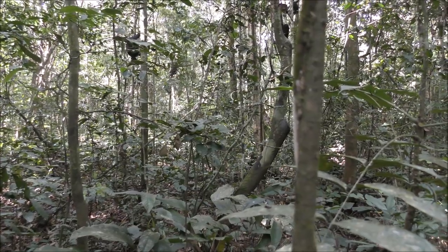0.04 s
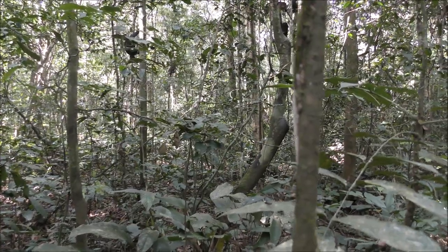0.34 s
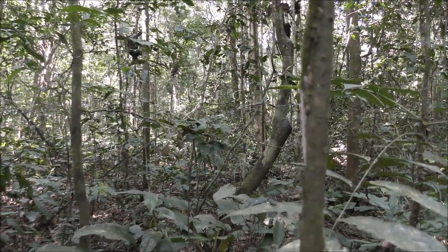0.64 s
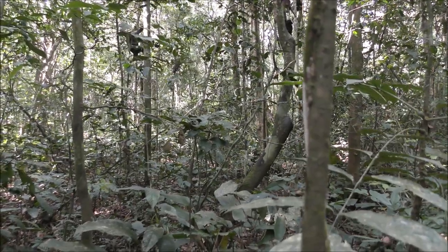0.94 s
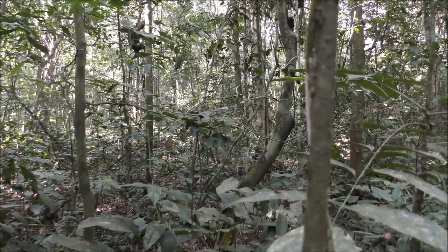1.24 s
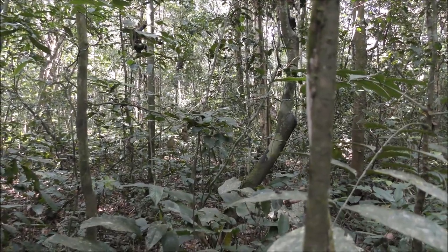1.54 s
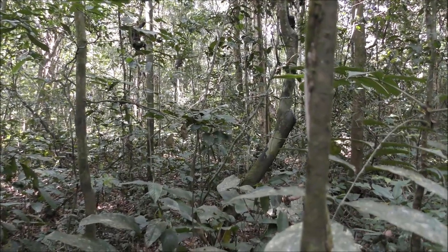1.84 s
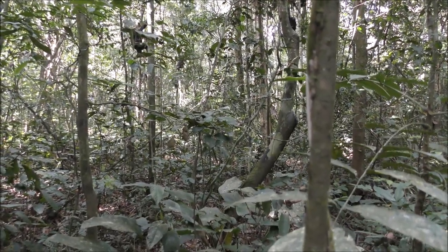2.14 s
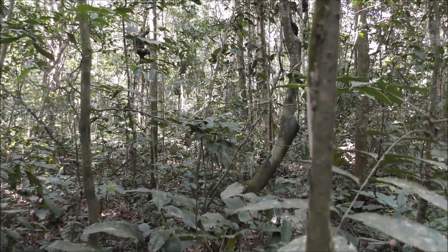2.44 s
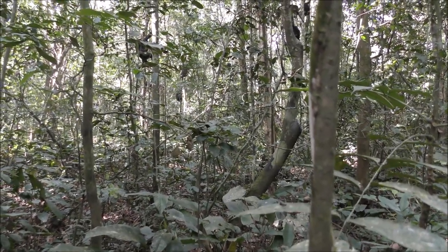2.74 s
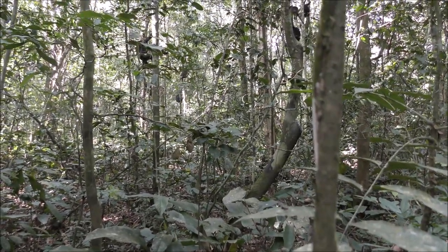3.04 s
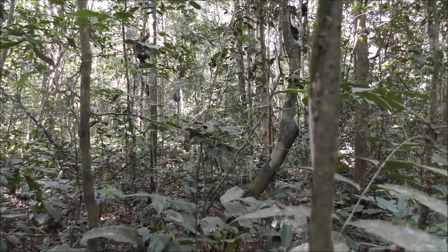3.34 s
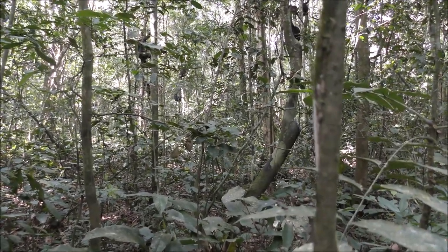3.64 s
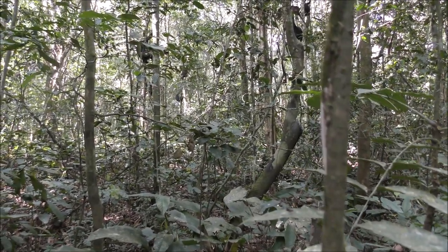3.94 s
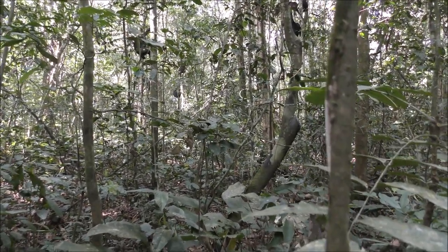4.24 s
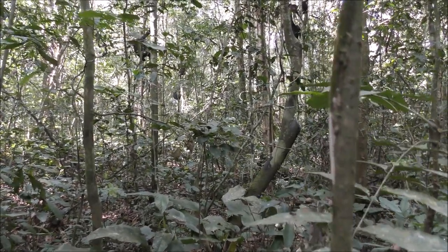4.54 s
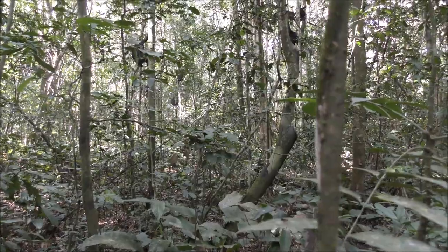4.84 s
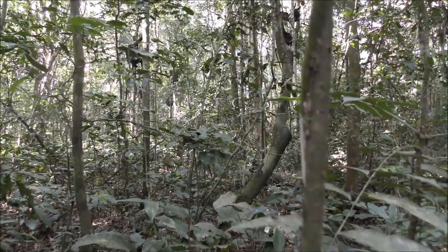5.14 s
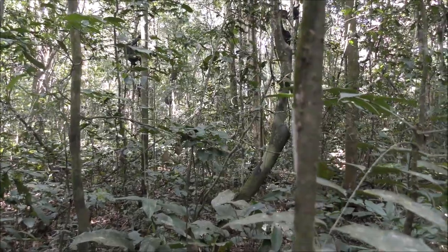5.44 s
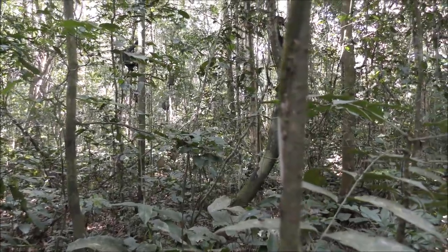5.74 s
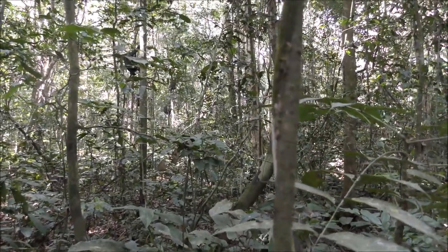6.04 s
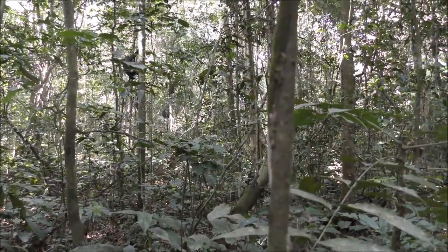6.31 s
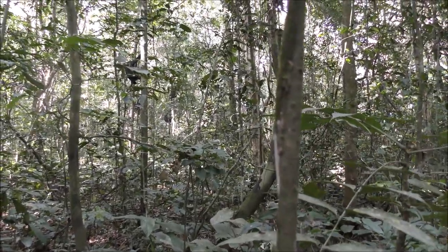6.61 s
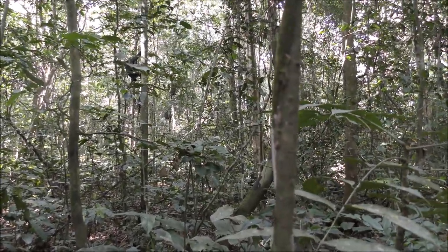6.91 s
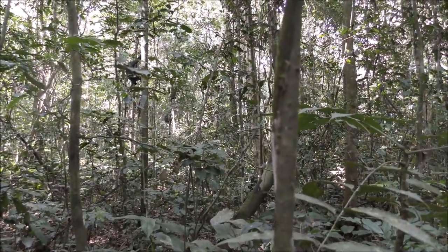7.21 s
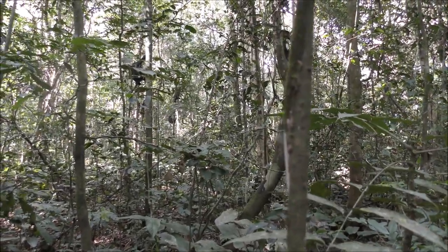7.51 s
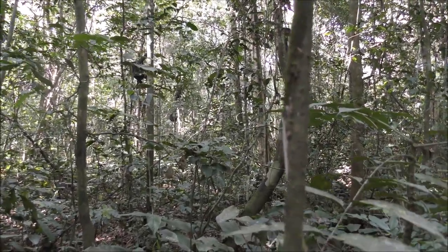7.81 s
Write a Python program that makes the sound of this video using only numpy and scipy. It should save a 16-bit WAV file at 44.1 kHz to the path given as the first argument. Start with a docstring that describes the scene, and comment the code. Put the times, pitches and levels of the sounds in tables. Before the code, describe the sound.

In a dense forest, leaves rustle and a few twigs snap over a low hum and faint, high insect hiss. A nearby ape lets out two loud, arching screams, then quick hoots, a buzzing shriek and a bark, all echoing among the trees. After a lull with scattered twig cracks, a farther animal answers with a few duller calls.

```python
"""Apes screaming in dense forest

Two arching screams, a buzzing shriek, short hoots and a bark are followed by a farther animal's calls.
Vibrating vocal folds give the harmonics, the throat shapes them, and strain adds jitter and rasp.
Trunks scatter the voices into a long tail. Twigs snap, leaves rustle and insects hiss over a low hum."""
import sys
import numpy as np
from scipy import signal
from scipy.fft import rfft, irfft, next_fast_len
from scipy.io import wavfile
from scipy.ndimage import uniform_filter1d

SR = 44100
rng = np.random.default_rng(int(sys.argv[2]) if len(sys.argv) > 2 else 0)


def to_wav(s):
    """Save 16-bit WAV."""
    ch = np.atleast_2d(s).T  # columns
    pcm = np.round(np.clip(ch, -1, 1) * 32767)  # PCM
    wavfile.write(sys.argv[1], SR, pcm.astype(np.int16))


N = 347067
TIME = np.arange(N) / SR
BAND_LIMIT_HZ = 15850

# Each row: start, rise and fall in seconds, starting, top and final pitch in Hz (halved before the
# break), effort in dB, seconds until the voice breaks upward, second harmonic before the break in dB.
SCREAMS = [(2.12, .125, .112, 1189, 3193, 1040, -21.5, 0.0774, 6),
           (2.487, .088, 0.15, 1330, 3571, 1145, -21, 0.052, -3.5)]
# Near hoots with the bark, and far calls. Each row: start, rise and fall in seconds, starting, top and
# final pitch in Hz, effort in dB, roughness from 0 to 1, second harmonic at the top pitch in dB.
NEAR_HOOTS = [(2.811, .062, .012, 1130, 1640, 1600, -28.5, .35, -20),
              (2.93, .045, .014, 950, 1060, 1020, -34.5, .65, 8),
              (2.99, .003, .026, 1200, 1070, 900, -27, .25, 1),
              (3.064, .052, .08, 1330, 1730, 840, -26, .12, -28),
              (3.504, .082, .014, 900, 1680, 1600, -17.5, .32, -20)]
FAR_HOOTS = [(6.84, 0.031, 0.012, 684, 815, 800, -33, 0.18, -14.5),
             (6.863, 0.066, 0.087, 1328, 2181, 1444, -27.5, 0.11, -1.5),
             (7.036, .003, 0.05, 1080, 1039, 770, -27, 0.25, 2),
             (7.43, 0.051, .052, 896, 1177, 881, -26.5, 0.16, 8.5)]
# Loudness as a voice glides through the throat's resonances. Each row: pitch in Hz, gain in dB.
NEAR_RESONANCE = [(600, 2.5), (780, -3.5), (1000, 3), (1200, -1), (1600, -2), (2000, -11.5), (2600, 0),
                  (3400, -3.5)]
FAR_RESONANCE = [(800, -19), (1150, -12), (1550, -3.5), (2200, -4)]
# The throat as a filter. Each row: frequency in Hz, gain in dB.
THROAT = [(1500, -24), (3000, -53), (4300, 8), (5200, -2), (6500, 1), (8000, 0.5), (9600, 3.5), (13000, -5),
          (16000, -10)]  # for harmonics above the second
SHRIEK_THROAT = [(430, -57), (1700, -6), (3400, -10), (3900, 0.5), (4320, 1), (5150, -17), (6600, 0.5),
                 (7600, -8), (8250, -8), (9450, -2), (10200, -9), (13300, -15), (16000, -30)]
# Air rasping through the open mouth. Each row: frequency in Hz, relative spectral density in dB.
RASP = [(600, -101), (1200, -9.5), (2200, 39), (3500, 26), (4400, 11), (6500, 10.5), (10000, 18),
        (16000, 3)]
SHRIEK_RASP = [(600, -39), (1200, 1), (2200, -8), (3500, -0.5), (5000, -2.5), (10000, -12), (16000, -29)]
# Breaking twigs. Each row: start in seconds, peak in dB, body frequency in Hz, treble share in dB,
# 60 dB decay time in seconds, left over right in dB.
SNAPS = [(0.953, -33.5, 5000, 2, 0.062, 6), (1.003, -31.5, 2590, -6, 0.027, 8),
         (1.9036, -22, 2330, 0, 0.11, 6), (1.908, -28, 2980, 2, 0.061, -11),
         (4.197, -32.5, 1480, -8, 0.022, 5), (5.3283, -22, 1160, -9, 0.036, 5),
         (6.005, -25, 1130, -29, 0.041, 6.5), (6.3, -36, 2100, -8, 0.039, 2),
         (7.3657, -26.5, 1150, -14.5, 0.036, 9), (7.383, -26.5, 10300, -12, 0.02, 4.5),
         (7.3838, -21.5, 750, -0.5, 0.018, 1), (7.506, -22, 1460, -8, 0.018, 5),
         (7.524, -32, 1700, -7, 0.059, 7)]
# Modes of dry wood. Each row: frequency in Hz, relative level in dB, 60 dB decay time in seconds.
WOOD_MODES = [(820, -2.5, 0.069), (1320, 4, 0.067), (2340, 8, 0.03), (2840, -41, 0.036)]
# Stirs of foliage. Each row: loudest moment, rise and fall in seconds, swish and crackle strength in dB.
RUSTLES = [(.14, 0.12, .3, -45.5, -59), (.21, 0.036, 0.068, -62, -49), (.51, 0.063, 0.23, -42.5, -54),
           (.8, 0.72, 0.9, -47.5, -55.5), (1.42, 0.083, 0.76, -54, -58), (1.832, 0.094, 0.14, -42.5, -47.5),
           (1.94, 0.084, 0.15, -42, -39.5), (6.29, 0.15, 0.22, -52.5, -66), (6.51, 0.068, 0.14, -63, -48.5),
           (7.835, 0.019, 0.031, -41, -65)]
# Noise spectra. Each row: frequency in Hz, relative spectral density in dB.
SWISH_SPECTRUM = [(410, -13), (700, -13), (905, -16), (1120, -4.5), (2170, -5), (2390, -5.5), (5510, -15),
                  (9000, -20.5), (11700, -21), (19800, -120)]
CRACKLE_SPECTRUM = [(3000, -4), (5500, -5), (9500, -2), (12500, -4), (16000, -13)]
CHORUS_SPECTRUM = [(6700, -35), (7300, -7), (7600, -2), (7950, 0), (8250, -10), (8700, -35)]
HUM_SPECTRUM = [(20, -25), (37, -33), (72, -6), (190, 0), (450, -7), (560, -16), (800, -17.5),
                (1600, -12.5), (4500, -23), (6200, -26.5), (9000, -25), (16000, -31.5)]
# The insect chorus. Each row: time in seconds, level in dB.
CHORUS_LEVEL = [(0, -58.5), (4.2, -59.5), (4.6, -59.5), (6.4, -59.5), (7.2, -58), (7.87, -60)]
# Single insects. Each row: start and end in seconds, frequency and bandwidth in Hz, level in dB.
CHIRPS = [(5.623, 6.0, 6200, 300, -67), (6.2, 6.42, 12600, 300, -71), (7.55, 7.65, 12290, 90, -55),
          (7.67, 7.78, 12290, 90, -60), (7.8, 7.87, 12290, 90, -61)]
# Likeness of the hum at the two ears. Each row: frequency in Hz, correlation.
HUM_CORRELATION = [(30, 0), (80, 0.79), (170, 0.92), (400, 0.9), (950, 0.94), (2400, 0.5), (6000, 0.94)]
# Decay of the forest's reverberation. Each row: frequency in Hz, 60 dB decay time in seconds.
TAIL_T60 = [(300, 0.36), (1000, 1.28), (2200, 1.17), (4000, 1.06), (7000, 0.97), (10000, 0.82),
            (15000, 0.45)]
# Its initial spectrum. Each row: frequency in Hz, relative level in dB.
TAIL_SPECTRUM = [(300, -45), (800, -10), (1500, -3.5), (3000, 3.5), (6000, 4), (12000, 3)]


def scream(rise_s, fall_s, start_hz, top_hz, end_hz, effort_db, break_s, low_second_db,
           swell_db=13, fade_db=-7, blend_s=0.0013, strain_s=0.04):
    """Register break: the voice swells an octave low, jumps up roughly, then clears, dulls and fades."""
    t, hz, _, down = pitch_arch(rise_s, fall_s, start_hz, top_hz, end_hz)
    high_share = (1 + np.tanh((t - break_s) / blend_s / 2)) / 2
    rough = .1 + .48 * np.exp(-abs(t - break_s) / strain_s)  # greatest at the break
    low_rough = rough + .25 * np.minimum(2 * t / break_s, 1)
    low_db = effort_db + 1 + swell_db * np.minimum(t / break_s - 1, 0) + read(NEAR_RESONANCE, hz / 2)
    high_db = effort_db + fade_db * np.sqrt(abs(down)) + read(NEAR_RESONANCE, hz)
    timbre = dict(slope_db=-10, smear=0.076)
    low = voice(t, hz / 2, low_db, low_rough, low_second_db, rasp_db=-8.5, **timbre)
    high = voice(t, hz, high_db, rough * (1 - down), second_db=-6 - 3 * down, rasp_db=-28, **timbre)
    return np.sqrt(1 - high_share) * low + np.sqrt(high_share) * high


def pitch_arch(rise_s, fall_s, start_hz, top_hz, end_hz, sag=.42):
    """Frequency glide: pitch eases to its top, sags, then plunges; up and down each run from 0 to 1."""
    t = np.arange(0, rise_s + fall_s, 1 / SR)
    rising, falling = np.clip(t / rise_s, 0, 1), np.clip((t - rise_s) / fall_s, 0, 1)
    up = np.sin(np.pi / 2 * rising) ** 2
    down = sag * falling + (1 - sag) * np.sin(np.pi / 2 * falling ** 2.3) ** 2
    hz = start_hz + (top_hz - start_hz) * up + (end_hz - top_hz) * down
    return t, hz, up, down


def voice(t, hz, level_db, rough, second_db, slope_db, smear, rasp_db=-6,
          jitter=0.116, shimmer=0.55, attack_s=0.0033, release_s=0.0071):
    """Source and filter: the throat weights the folds' harmonics; strain adds jitter, shimmer and rasp."""
    phase = 2 * np.pi * np.cumsum(hz * (1 + jitter * rough * wander(len(t), hz=330))) / SR
    phase += smear * wander(len(t), hz=350)  # uneven cycles blur the high harmonics most
    second = gain_of(second_db) * np.ones(len(t))
    heights = [np.ones(len(t)), second]
    for k in range(3, 9):
        throat = gain_of(read(THROAT, k * hz) + slope_db * np.log2(k / 2))
        heights.append(np.minimum(second, 1) * throat * (k * hz < BAND_LIMIT_HZ))
    folds = sum(h * np.sin(k * phase) for k, h in enumerate(heights, 1)) / np.linalg.norm(heights, axis=0)
    folds *= (1 + shimmer * rough * wander(len(t), hz=700)) / np.hypot(1, shimmer * rough)
    breath = coloured(rng.standard_normal(len(t)), RASP)
    rasp = gain_of(rasp_db) * rough * np.sqrt(np.clip(2 * rough, 0, 1)) * breath
    gate = np.minimum(t / attack_s, 1) * np.minimum((t[-1] - t) / release_s, 1)
    return gain_of(level_db) * gate * (np.sqrt(2) * folds + rasp)


def shriek(top_s=2.9, rise_s=0.025, fall_s=0.054, hz=427.4, buzz_db=-26.5, rasp_db=-27.5):
    """Harmonic series: folds slapping shut at a low steady rate give a bright buzz, mixed with rasp."""
    t, out = np.arange(top_s - 2 * rise_s, top_s + 2 * fall_s, 1 / SR), np.zeros(N)
    phase = 2 * np.pi * np.cumsum(hz * (1 + .005 * wander(len(t), hz=120))) / SR
    buzz = sum(gain_of(read(SHRIEK_THROAT, k * hz)) * np.sin(k * phase + 2 * np.pi * rng.random())
               for k in range(1, 37))
    rasp = coloured(rng.standard_normal(len(t)), SHRIEK_RASP)
    call = gain_of(buzz_db) * unit_rms(buzz) + gain_of(rasp_db) * rasp
    add(out, t[0], swell(t, top_s, rise_s, fall_s) * call)
    return out


def hoots(rows, resonance, swell_db, fade_db, second_db_per_octave, clearing, slope_db, smear):
    """Resonance: short calls glide through the throat's peaks, swelling hoarsely and then clearing."""
    out = np.zeros(N)
    for start, rise_s, fall_s, start_hz, top_hz, end_hz, effort_db, rough, top_second_db in rows:
        t, hz, up, down = pitch_arch(rise_s, fall_s, start_hz, top_hz, end_hz)
        level_db = effort_db + swell_db * (up - 1) + fade_db * down + read(resonance, hz)
        hoarse = rough * np.exp(-clearing * down)
        second_db = top_second_db + second_db_per_octave * np.log2(top_hz / hz)
        onset = np.minimum(t / (0.43 * rise_s), 1)
        add(out, start, onset * voice(t, hz, level_db, hoarse, second_db, slope_db, smear))
    return out


def near_calls():
    """Superposition: the near animals' shriek, hoots, bark and screams add together."""
    out = shriek() + hoots(NEAR_HOOTS, NEAR_RESONANCE, swell_db=10, fade_db=-3.3,
                           second_db_per_octave=27, clearing=.9, slope_db=-12.5, smear=0.19)
    for start, *shape in SCREAMS:
        add(out, start, scream(*shape))
    return out


def far_calls():
    """Spectral tilt: the farther animal's harmonics fall off steeply, so its answers sound duller."""
    return hoots(FAR_HOOTS, FAR_RESONANCE, swell_db=1.5, fade_db=-4,
                 second_db_per_octave=-30, clearing=0.27, slope_db=-24, smear=0.033)


def trees(x, early_db, trunks_db, tail_db, clear_hz,
          early_t60=0.12, trunks_s=.033, trunks_t60=0.1, build_s=0.039):
    """Scattering: leaves dull the direct sound; near stems, large trunks and the deep forest echo it."""
    t = np.arange(SR * 3 // 2) / SR
    taps = rng.choice([-1., 1.], (6, len(t))) * (rng.random((6, len(t))) < 2500 / SR)
    early = stereo(*taps[:2], 0.72) * gain_of(-60 * t / early_t60)
    trunks = stereo(*taps[4:], 0.8) * gain_of(-60 * t / trunks_t60) * (t > trunks_s)
    scatter = stereo(*taps[2:4], 0.8) * (1 - np.exp(-t / build_s))
    hz, age, spectra = signal.stft(scatter, SR, nperseg=256)
    spectra *= gain_of(read(TAIL_SPECTRUM, hz)[:, None] - 60 * age / read(TAIL_T60, hz)[:, None])
    tail = signal.istft(spectra, SR, nperseg=256)[1][:, :len(t)]
    echoes = sum(gain_of(db) * part / np.linalg.norm(part[0])
                 for db, part in [(early_db, early), (trunks_db, trunks), (tail_db, tail)])
    direct = signal.sosfilt(signal.butter(2, clear_hz, fs=SR, output="sos"), x)
    return direct + signal.fftconvolve(np.atleast_2d(x), echoes, axes=1)[:, :N]


def twig_snaps(rise_s=0.00027, knock=0.43):
    """Brittle fracture: cracking fibres give a damped woody body and a brief sharp edge."""
    t, out = np.arange(SR // 8) / SR, np.zeros((2, N))
    ring = sum(gain_of(db - 60 * t / t60) * np.sin(2 * np.pi * hz * t) for hz, db, t60 in WOOD_MODES)
    for start, db, hz, treble_db, t60, left_db in SNAPS:
        spread = 1 + min(1.24, 2200 / hz)
        band = signal.butter(2, [hz / spread, hz * spread], "band", fs=SR, output="sos")
        body = unit_rms(signal.sosfilt(band, rng.standard_normal(len(t))))
        body += knock * signal.sosfilt(band, ring)  # only thick twigs knock
        edge = gain_of(treble_db - 80 * t / t60) * coloured(rng.standard_normal(len(t)), CRACKLE_SPECTRUM)
        burst = (body * gain_of(-60 * t / t60) + edge) * (1 - np.exp(-t / rise_s))
        for channel, side in zip(out, (1, -1)):
            add(channel, start, gain_of(db + side * left_db / 2) * burst / abs(burst).max())
    return out


def leaf_rustle(trim_db=-1, ticks_per_s=2500, tick_spread_db=1.5):
    """Friction noise: leaves brush past each other in a swish with a fine crackle of edges."""
    out = np.zeros((2, N))
    stirs = np.array([swell(TIME, top_s, rise_s, fall_s) for top_s, rise_s, fall_s, _, _ in RUSTLES])
    *_, swish_db, crackle_db = np.transpose(RUSTLES)
    for strengths_db, spectrum in (swish_db, SWISH_SPECTRUM), (crackle_db, CRACKLE_SPECTRUM):
        level = np.sqrt(gain_of(strengths_db) ** 2 @ stirs ** 2)  # stirs add in power
        sizes = gain_of(tick_spread_db * np.minimum(rng.exponential(1, (2, N)), 5))
        signs = rng.choice([-1, 1], (2, N))
        ticks = unit_rms(sizes * signs * (rng.random((2, N)) < ticks_per_s / SR))
        grains = coloured(ticks + rng.standard_normal((2, N)), spectrum)
        out += gain_of(trim_db) * level * stereo(*grains, 0.91)
    return out


def insects(throb=0.081, throb_hz=25):
    """Narrow-band noise: a high chorus throbs faintly, and single insects join with fuzzy tones."""
    chorus = stereo(*coloured(rng.standard_normal((2, N)), CHORUS_SPECTRUM), 1.0)
    chorus *= gain_of(np.interp(TIME, *np.transpose(CHORUS_LEVEL)))
    singles = np.zeros(N)
    for start, end, hz, width_hz, db in CHIRPS:
        t = np.arange(start, end, 1 / SR)
        tone = sum(wander(len(t), width_hz / 2) * wave(2 * np.pi * hz * t) for wave in (np.cos, np.sin))
        add(singles, start, gain_of(db) * unit_rms(tone) * signal.windows.tukey(len(t), .4))
    return chorus * (1 + throb * wander(N, throb_hz)) + singles


def forest_hum(level_db=-47, patchy_db=.8):
    """Partly coherent noise: a distant low wash and faint hiss drift in patches of time and frequency."""
    frames, hz = N // 256 + 5, np.fft.rfftfreq(1024, 1 / SR)
    mid_re, mid_im, side_re, side_im, patches = rng.standard_normal((frames, len(hz), 5)).T
    patches = unit_rms(uniform_filter1d(uniform_filter1d(patches, size=8, axis=0), size=16, axis=1))
    spectra = stereo(mid_re + 1j * mid_im, side_re + 1j * side_im, read(HUM_CORRELATION, hz)[:, None])
    spectra *= gain_of(read(HUM_SPECTRUM, hz)[:, None] + patchy_db * patches)
    hum = signal.istft(spectra, nperseg=1024, noverlap=768)[1][:, :N]
    return gain_of(level_db) * unit_rms(hum)


def gain_of(db):
    """The decibel scale: 20 dB is a tenfold amplitude."""
    return 10 ** (np.asarray(db) / 20)


def unit_rms(x):
    """Normalisation to a mean power of 1."""
    return x / np.sqrt(np.mean(x ** 2) + 1e-20)


def read(points, hz):
    """Interpolation on a log-frequency axis."""
    frequencies, values = np.transpose(points)
    return np.interp(np.log(hz + 1), np.log(frequencies + 1), values)


def add(mix, start_s, sound):
    """Superposition of a sound on the mix."""
    part = mix[max(round(start_s * SR), 0):][:len(sound)]
    part += sound[:len(part)]


def coloured(x, spectrum):
    """Filtering by multiplication of spectra, at rms 1."""
    size = next_fast_len(x.shape[-1])
    gains = gain_of(read(spectrum, np.fft.rfftfreq(size, 1 / SR)))
    return unit_rms(irfft(rfft(x, size) * gains, size)[..., :x.shape[-1]])


def wander(size, hz):
    """Low-pass noise: random motion up to a rate, at rms 1."""
    return unit_rms(signal.sosfilt(signal.butter(2, hz, fs=SR, output="sos"), rng.standard_normal(size)))


def swell(t, top_s, rise_s, fall_s):
    """Gaussian envelope with separate rise and fall."""
    return np.exp(-((t - top_s) / np.where(t < top_s, rise_s, fall_s)) ** 2)


def stereo(a, b, correlation):
    """Sum and difference: two unrelated signals give two channels of a set correlation."""
    mid, side = a * np.sqrt((1 + correlation) / 2), b * np.sqrt((1 - correlation) / 2)
    return np.array([mid + side, mid - side])


def scene():
    """Direct-to-reverberant ratio: far calls carry the most echo, twigs the least, over the forest bed."""
    near = trees(near_calls(), early_db=-3.5, trunks_db=-10, tail_db=-3.5, clear_hz=6200)
    far = trees(far_calls(), early_db=-1.5, trunks_db=-5, tail_db=-1, clear_hz=5030)
    apes = near * gain_of([[-1.1], [-.8]]) + far * gain_of([[-.9], [-.6]])  # left and right gains
    twigs = trees(twig_snaps(), early_db=-4.5, trunks_db=-15, tail_db=-18, clear_hz=12700)
    return apes + twigs + leaf_rustle() + insects() + forest_hum()


def record(dry, flutter_db=-24, flutter_hz=170):
    """Modulation noise: a low flutter, different in each ear, follows the loudness; then a band limit."""
    loudness = np.sqrt(abs(uniform_filter1d((dry ** 2).mean(0), size=900)))
    flutter = gain_of(flutter_db) * loudness * np.array([wander(N, flutter_hz) for _ in dry])
    low_pass = signal.firwin(511, BAND_LIMIT_HZ, window=("kaiser", 9), fs=SR)
    return signal.oaconvolve(dry + flutter, low_pass[None], "same")


dry = scene()
out = record(dry)
to_wav(out)
```